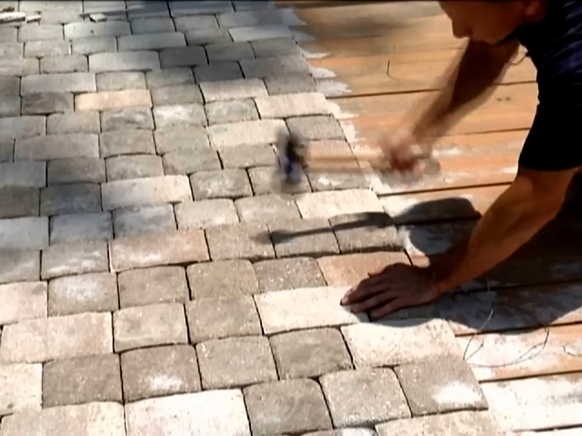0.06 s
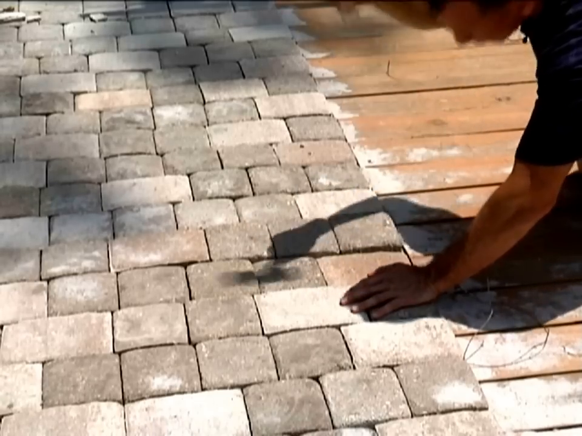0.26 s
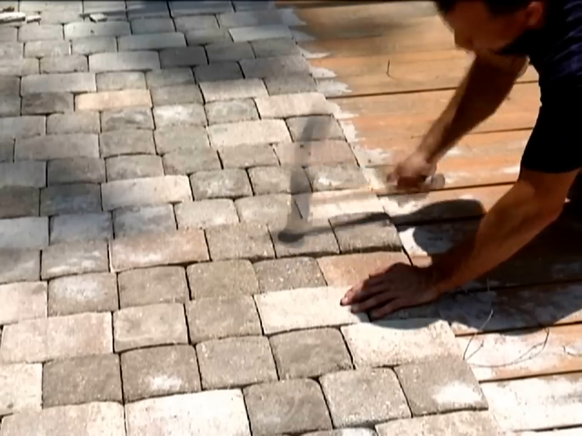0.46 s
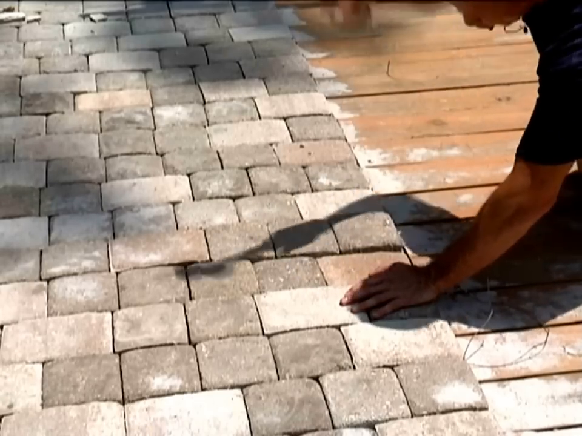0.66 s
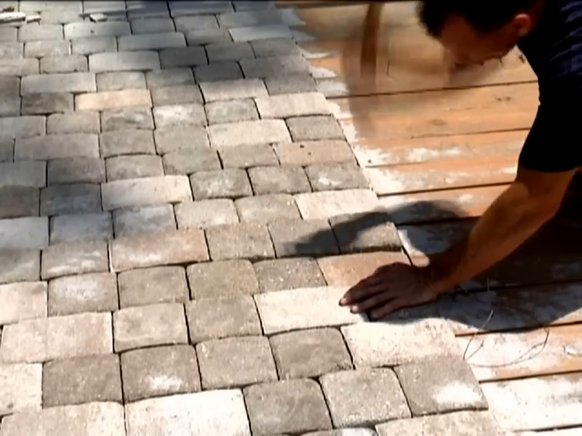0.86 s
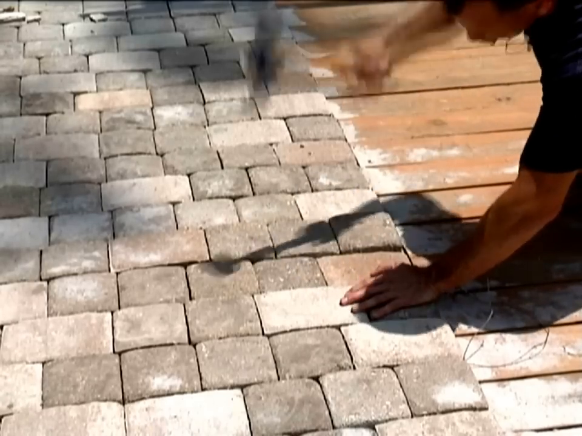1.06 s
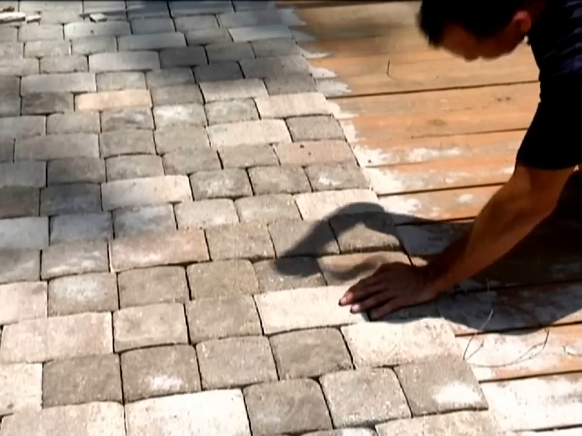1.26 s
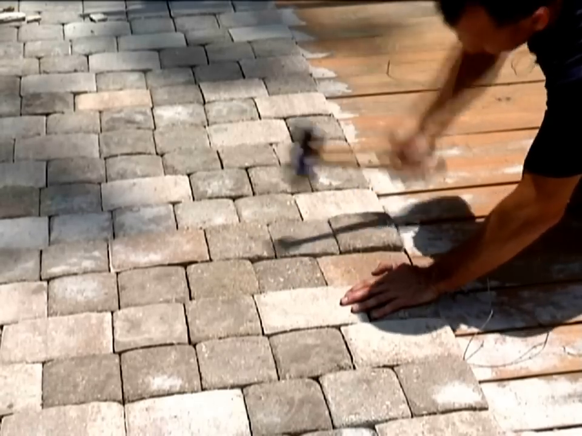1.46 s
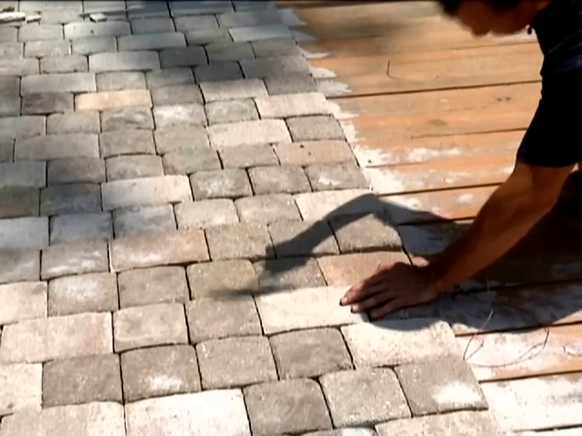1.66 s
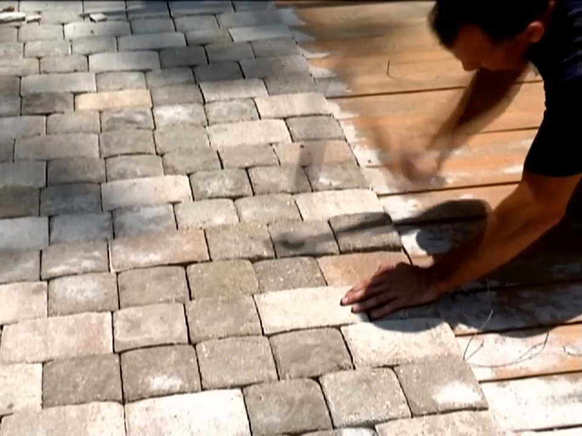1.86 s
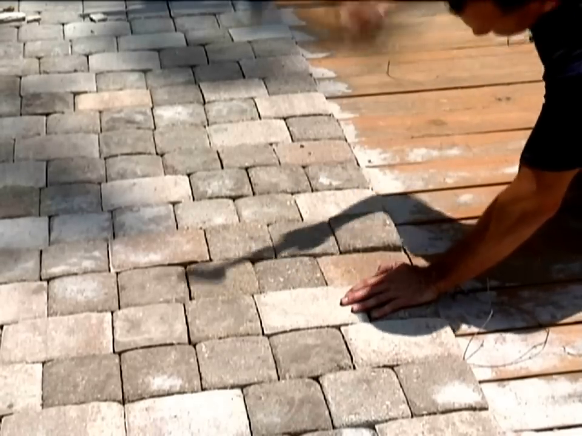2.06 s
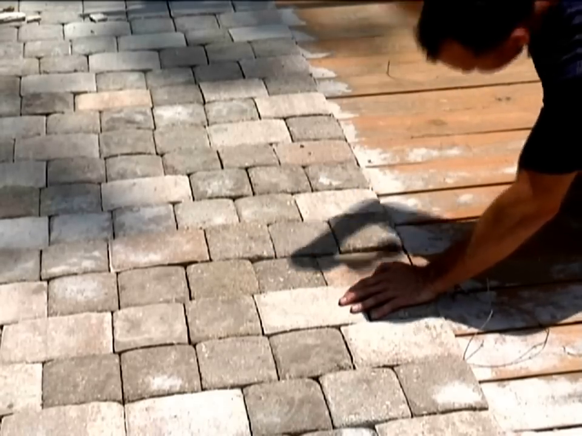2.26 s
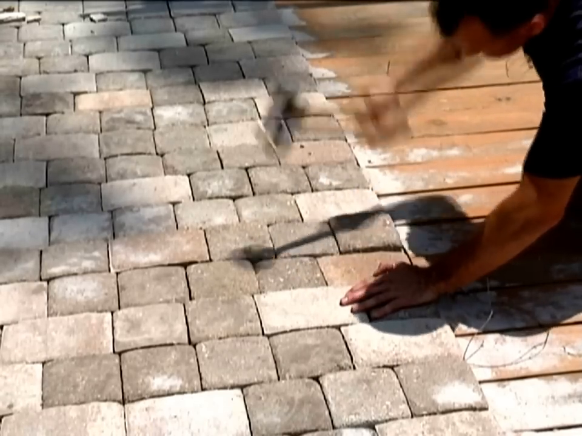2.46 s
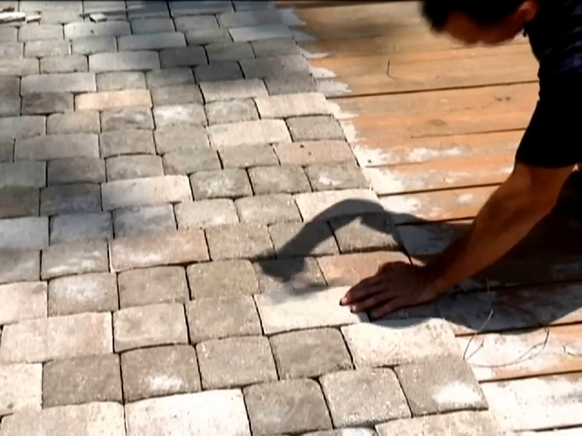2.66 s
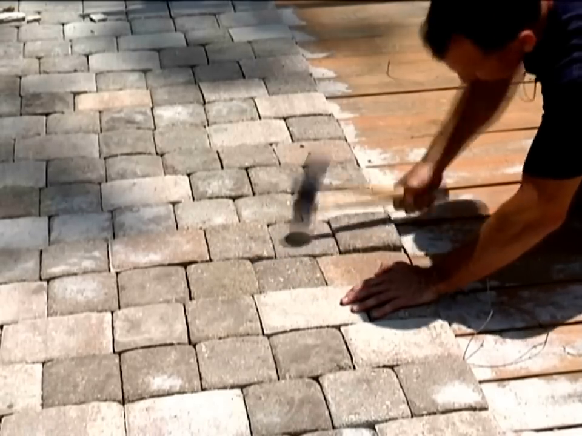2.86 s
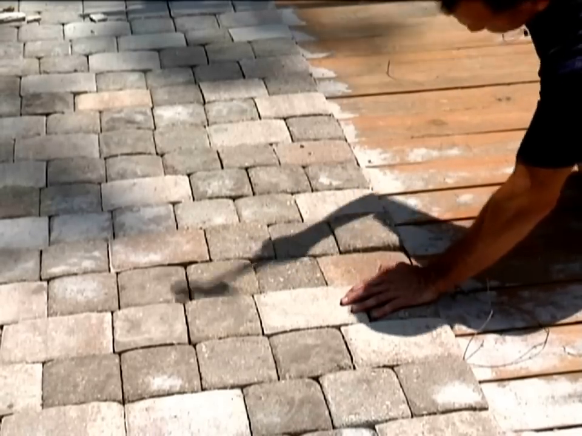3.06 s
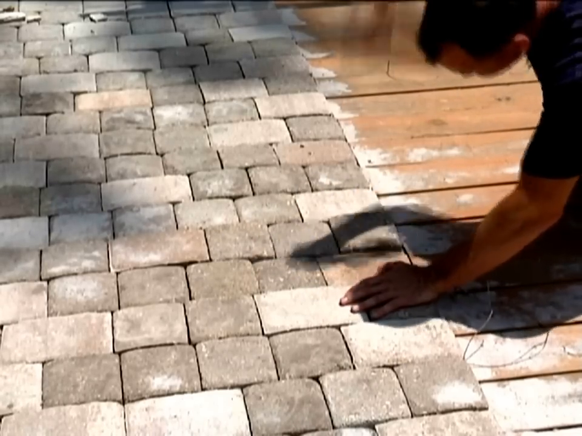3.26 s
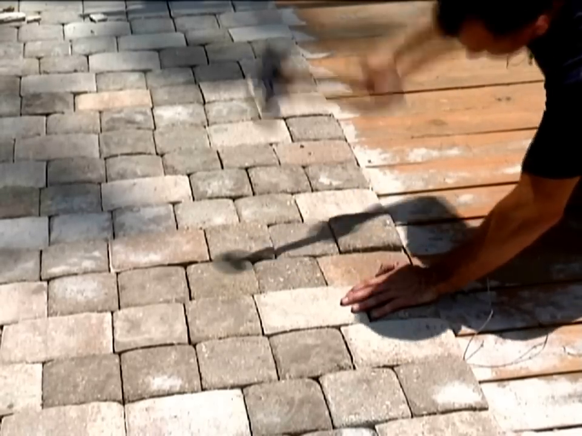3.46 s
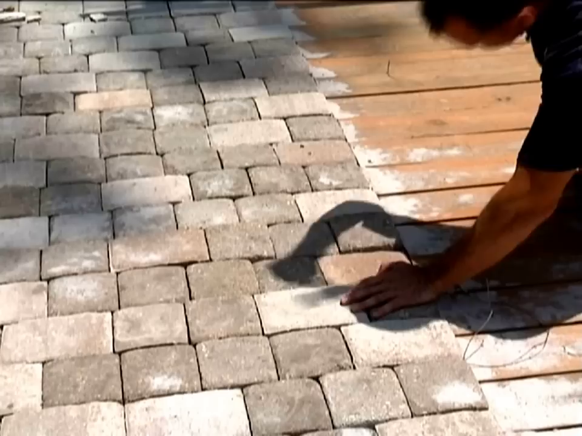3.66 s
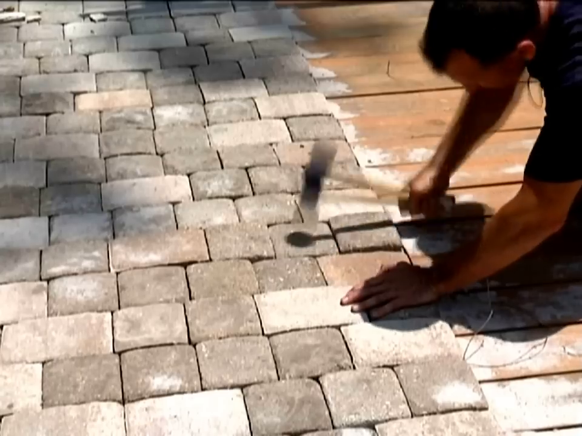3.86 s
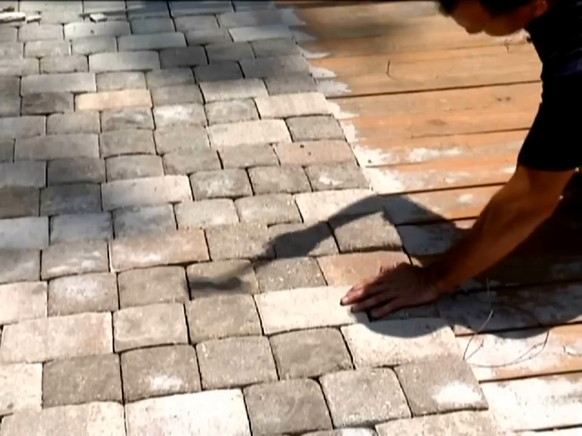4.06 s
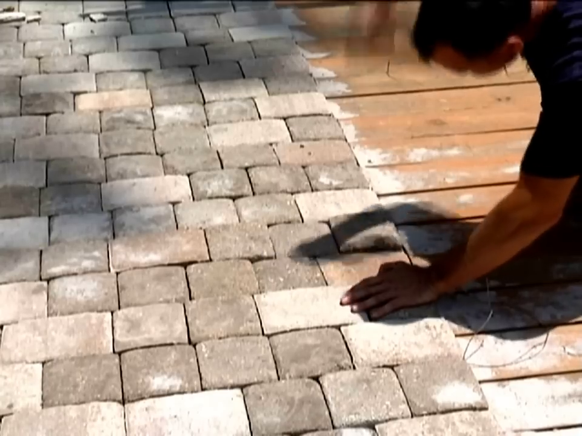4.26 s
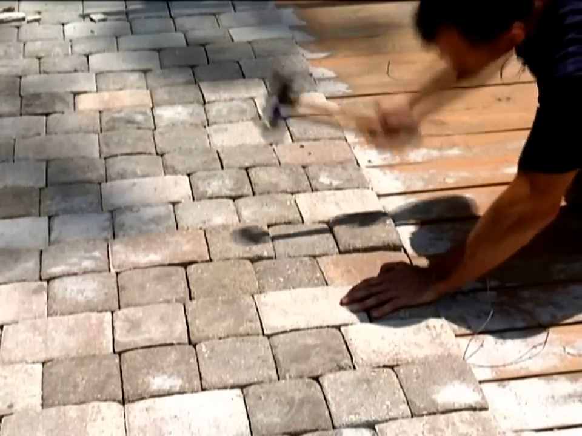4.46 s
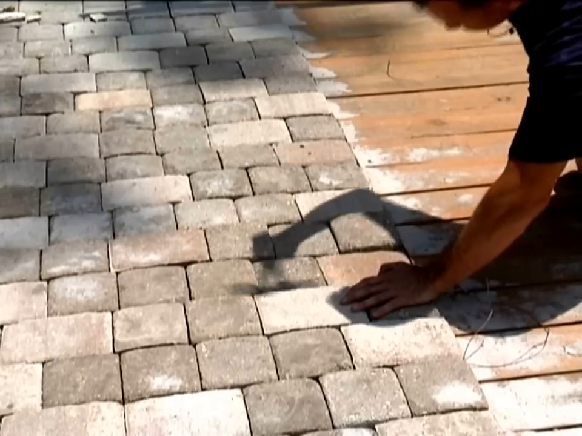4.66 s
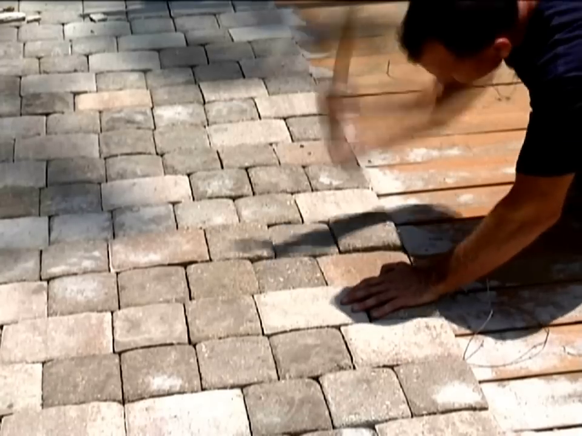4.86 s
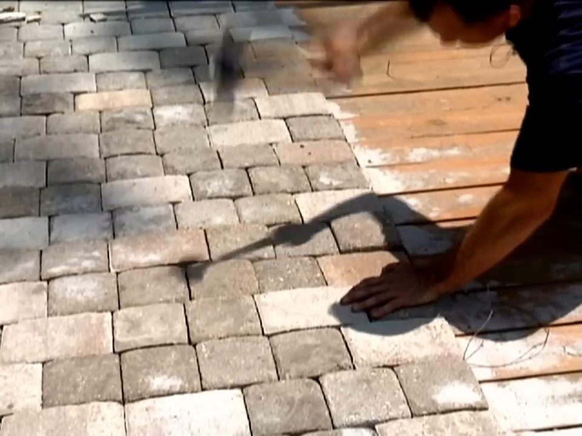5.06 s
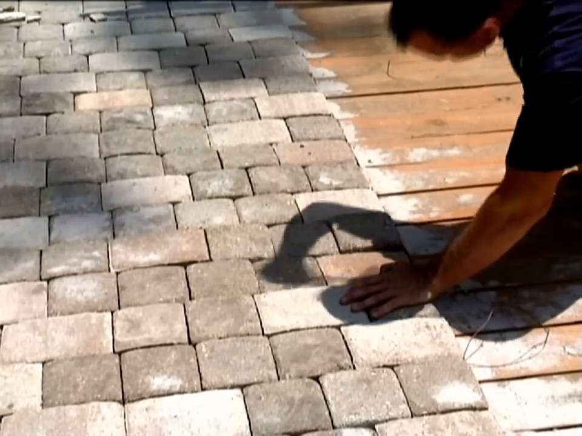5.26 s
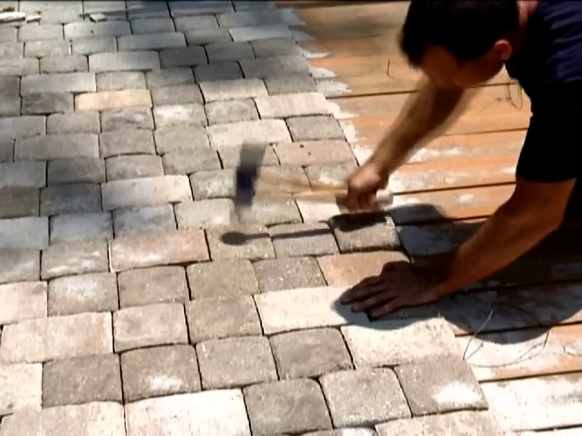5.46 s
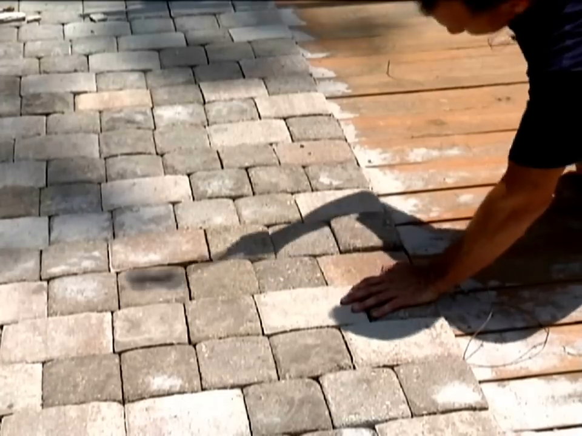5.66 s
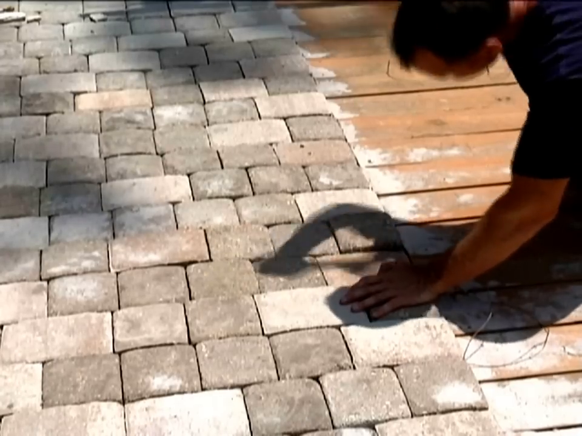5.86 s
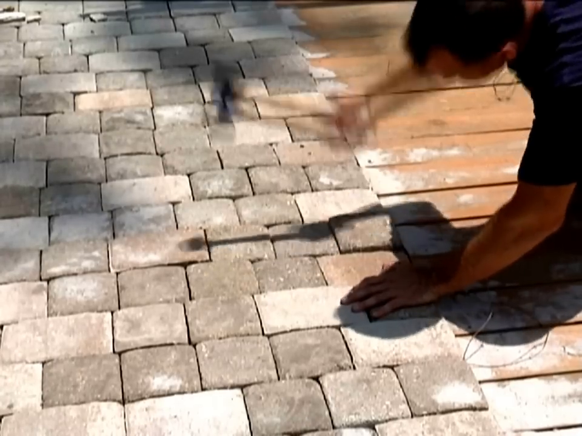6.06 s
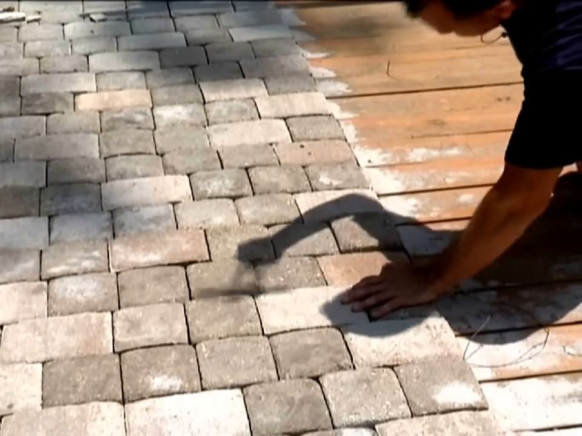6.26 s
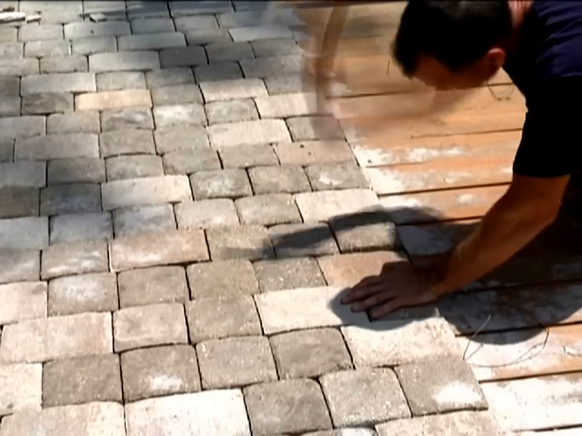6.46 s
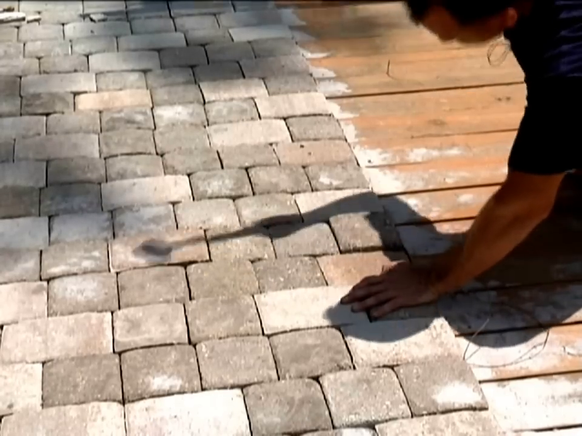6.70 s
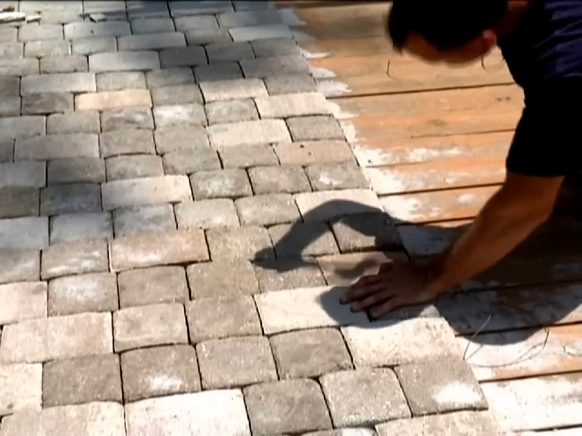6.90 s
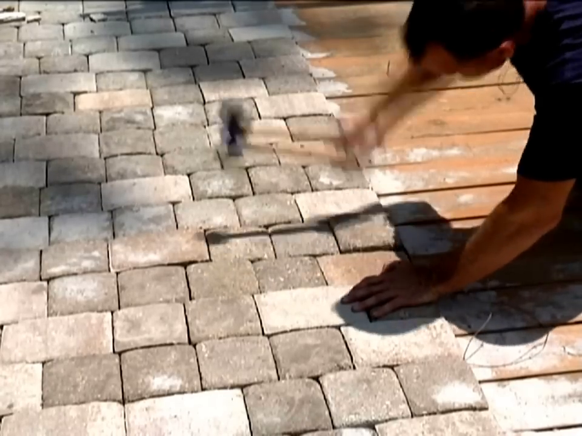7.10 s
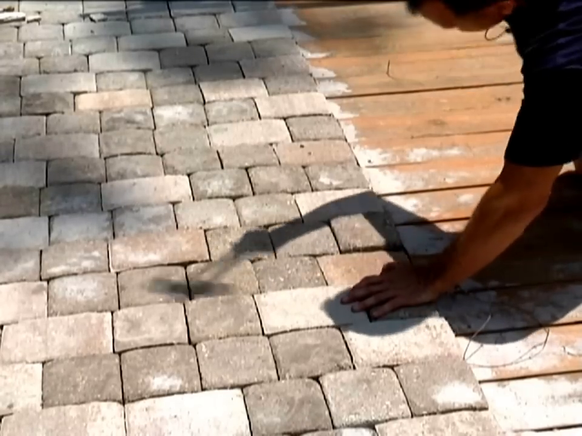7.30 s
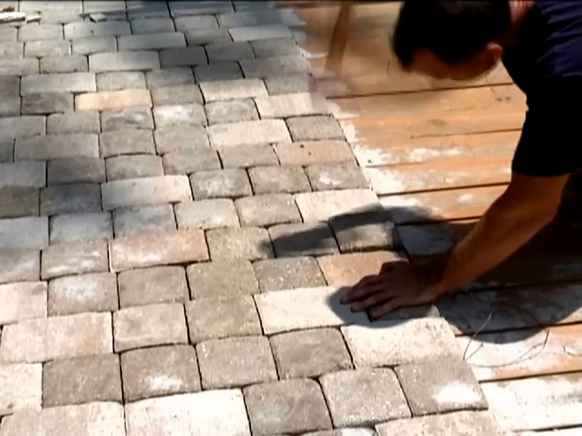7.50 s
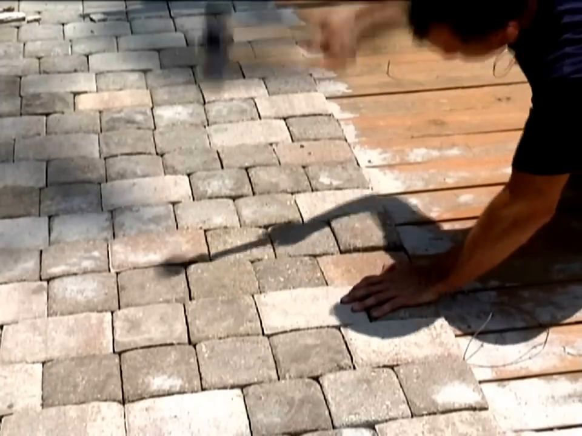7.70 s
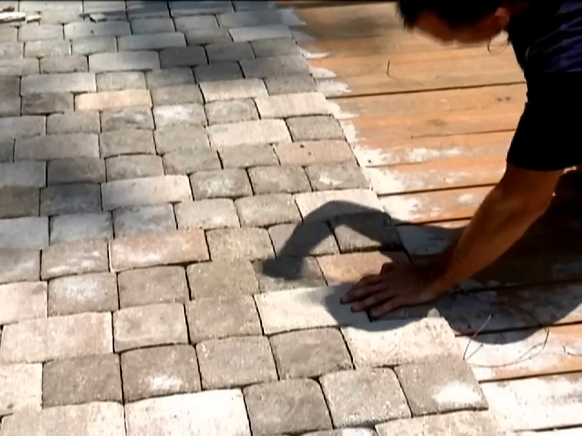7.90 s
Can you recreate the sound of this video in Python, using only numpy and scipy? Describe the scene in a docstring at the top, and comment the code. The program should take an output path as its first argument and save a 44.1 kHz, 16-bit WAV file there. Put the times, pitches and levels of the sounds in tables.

```python
"""Rubber mallet on a paver

A mallet taps a concrete paver into its sand bed on a raised wooden deck, twice a second.
Each blow knocks the paver, booms the deck and throws up sand that patters back; the loose head ticks.
The left microphone is close and overloads on every blow; the right is farther off and hears it later."""
import sys
import numpy as np
from scipy import signal
from scipy.io import wavfile

SR = 44100
rng = np.random.default_rng(int(sys.argv[2]) if len(sys.argv) > 2 else 0)


def bounce(signal):
    """Save signal as a 16-bit WAV file at the path given by the first command-line argument."""
    frames = np.transpose(np.atleast_2d(signal))
    limited = np.clip(frames, -1, 1)
    pcm = np.round(limited * 32767).astype(np.int16)
    wavfile.write(sys.argv[1], SR, pcm)


N = 350018
EVENT_TIME_S = np.arange(int(.8 * SR)) / SR

# mallet blows: start_s, force_db
BLOWS = [(-0.004, -2.5), (0.467, -3.5), (0.9201, 0), (1.3989, 0), (1.878, 0.5), (2.3637, 1), (2.851, 0.5),
         (3.34, 0), (3.8416, 0), (4.3421, 1), (4.9055, 1.5), (5.4415, -2.5), (5.9718, -0.5), (6.5123, 0.2),
         (7.0351, -1), (7.5617, -0.5)]
# seating of the paver, 0 loose to 1 firm: time_s, firmness
BED_FIRMNESS = [(0, 0), (2.5, 0.39), (4.9, 0.14), (5.4, 0.48), (7.6, 0.52)]
# paver modes (firmly bedded ring, crack, drop on its edge): pitch_hz, level_db, t60_s
BITE_MODES = [(869, -3, 0.034), (1328, 1, 0.027), (1902, -1, 0.028)]
CRACK_MODES = [(1314, 12, 0.018), (2020, 3.5, 0.018), (2210, 5, 0.0078), (2627, 6, 0.013),
               (3345, 0, 0.0087), (5494, -2, 0.021), (6330, 4, 0.019), (6720, 5.5, 0.028),
               (8540, 5.5, 0.017), (10944, 11.5, 0.0081)]
EDGE_MODES = [(2590, 8.5, 0.0029), (5500, 0, 0.015), (6160, -1, 0.0095), (6900, 11, 0.0025),
              (8450, 8, 0.002), (10300, 7, 0.0025)]
# deck modes: pitch_hz, t60_s, left_db, right_db
DECK_MODES = [(37.5, 0.34, -25.5, -52), (62.3, 0.37, -23.5, -32), (66.7, 0.082, -8.5, -21),
              (91.2, 0.062, 10, -19), (86.63, 1, -35, -45), (107.7, 0.43, -21.5, -31.5),
              (162.5, 0.32, -21.5, -54), (191.3, 0.58, -28.5, -38), (205.7, 0.061, -13, -10.5),
              (234.5, 0.12, -3, -17.5), (277, 0.16, -23, -17.5), (348, 0.53, -29, -35),
              (398.4, 0.04, -7, -9.5), (444, 0.082, -18, -16.5), (477, 0.12, -16, -26.5),
              (527, 0.077, -9, -48), (731.4, 0.071, -5, -44), (800.4, 0.073, -10.5, -42),
              (878.5, 0.054, -2, -16), (942, 0.082, -18.5, -28)]
# heaves of the whole deck: start_s, level_db
HEAVES = [(3.338, 0.5), (4.3416, 1)]
# diffuse rumble of boards and joists: freq_hz, density_db
RUMBLE_LEFT_SPECTRUM = [(25, -29), (60, 6.5), (120, -7), (210, 0.5), (310, -5), (450, 1.5), (610, -12.5),
                        (750, -12), (1100, -22.5), (2500, -33.5), (4000, -49), (12000, -54)]
RUMBLE_RIGHT_SPECTRUM = [(25, -49), (70, -12), (210, 4.5), (310, -6), (420, 5.5), (620, -9), (750, -11.5),
                         (1200, -19), (2500, -16), (4200, -29.5), (6300, -19), (12000, -47)]
# rumble decay: freq_hz, t60_s
RUMBLE_DECAY = [(40, 0.83), (100, 0.67), (200, 0.71), (450, 0.45), (900, 0.6), (3000, 0.66), (10000, 0.81)]
# mallet head shifting on its handle: start_s, wood_db, bright_db
TICKS = [(0.129, -64, -32.5), (0.905, -30, -27.5), (1.381, -35, -42), (1.447, -36, -32), (1.860, -40, -41),
         (2.1445, -61, -29), (2.3116, -29.5, -29.5), (3.808, -30.5, -47), (5.394, -33.5, -52),
         (5.415, -32, -34), (5.746, -41, -45.5), (6.271, -35, -41), (6.299, -43, -45), (6.823, -29, -32),
         (6.847, -39, -38.5), (7.337, -31.5, -37), (7.352, -41, -40), (7.523, -38, -49), (7.834, -41, -51),
         (7.881, -42.5, -48)]
# mallet modes: pitch_hz, level_db, t60_s
HANDLE_MODES = [(920, -5, .02), (1500, -4, .004), (2150, -3, .006), (2450, -1, .011), (2850, -1, .005)]
HEAD_MODES = [(5450, -1, .008), (6200, 0, .004), (7700, -1, .003), (9500, -4, .004), (10350, -4, .014),
              (11500, -7, .004)]
# hollow between handle and head: freq_hz, gain_db
MALLET_CAVITY = [(2900, 0), (4200, -15.5), (5300, 2.5), (12000, 1)]
# board judders, hand slips, sleeve swishes: start_s, level_db, length_s
JUDDERS = [(4.414, -20, 0.026), (4.452, -24, 0.043)]
SCUFFS = [(2.3405, -28, 0.0027), (2.81, -30, 0.033), (7.521, -29.5, 0.0051)]
SWISHES = [(2.67, -64, 0.015), (3.65, -49, 0.031), (5.755, -44.5, 0.018), (6.305, -46.5, 0.036),
           (6.795, -46, .02), (6.858, -43.5, 0.011), (7.365, -44, 0.017)]
# falling sand, loose board, bracing hand, slipping hand, sleeve, garden air: freq_hz, density_db
SAND_SPECTRUM = [(300, -56), (1200, -7), (2400, -11), (3800, -2), (5700, 3), (7200, -1.5), (9000, -2.5),
                 (11000, -5), (13800, -9), (15200, -73)]
BOARD_SPECTRUM = [(60, -23), (170, 17.5), (450, -3.5), (700, 3), (1200, -14.5), (4300, -26), (9000, -24)]
BRACE_SPECTRUM = [(100, -30), (500, 5), (900, 5.5), (1600, -3), (2600, -7), (4000, -19), (10000, -18),
                  (14000, -32)]
SCUFF_SPECTRUM = [(100, -12), (500, 6), (900, 8), (1600, -1), (2600, -8), (4000, -19), (10000, -12),
                  (14000, -16)]
SLEEVE_SPECTRUM = [(1000, -16), (4000, -16), (6000, -6), (8500, -15), (10500, 1), (12000, -9), (13800, -19),
                   (15000, -27)]
AIR_SPECTRUM = [(20, -11), (55, 2), (110, 3), (160, -4.5), (400, -10.5), (600, -17), (800, -15),
                (1300, -20.5), (2200, -27.5), (3600, -37), (5600, -30), (10500, -31.5), (13300, -35),
                (14200, -76)]
# path of the small sounds to the far microphone: freq_hz, gain_db
FAR_PATH = [(40, -24), (100, -43.5), (300, 1), (1000, -30.5), (2400, -9), (3200, -11), (4500, -19.5),
            (6300, -19.5), (9000, -21.5), (13000, -27)]


def knock(rock_db=11, rock_hz=890, push_db=8, push_hz=520, t60_s=0.019, bite_db=10, far_db=-22):
    """Rubber on concrete: the paver rocks a few cycles, with more bite as it seats; little bass carries."""
    out = np.zeros(N)
    for start_s, force_db in BLOWS:
        firm = firmness(start_s)
        rock_aim, push_aim, bite_aim = 1 + 0.034 * rng.standard_normal(3)  # the struck spot varies
        bite = sum(amp(db) * ring(hz * bite_aim, decay_s) for hz, db, decay_s in BITE_MODES)
        rock = amp(rock_db + 1.3 * force_db) * ring(rock_hz * rock_aim, t60_s)
        push = amp(push_db + 5 * firm) * ring(push_hz * push_aim, t60_s)
        add(out, start_s, -rock - push - amp(bite_db) * firm ** 2 * bite)
    return np.array([high_passed(out, 147), amp(far_db) * high_passed(out, 650, order=2)])


def paver(crack_db=0.16, grind_db=-21, grind_s=.009, rebound_db=-32, rebound_s=.0232):
    """The paver cracks on its neighbours, grinds in its dip and clacks back, harder on a firm bed."""
    out = np.zeros(N)
    for start_s, _ in BLOWS:
        crack = clack(CRACK_MODES, contact_s=0.0013, grit=0.81, spread=0.0374)
        add(out, start_s + 0.00033, amp(crack_db) * crack)
        dip_s = start_s + grind_s * rng.uniform(0.99, 1.5)
        add(out, dip_s, amp(grind_db) * clack(CRACK_MODES, contact_s=0.0071, grit=3.1))
        rebound = clack(EDGE_MODES, contact_s=.0018, grit=0.19)
        add(out, start_s + rebound_s, amp(rebound_db + 20 * firmness(start_s)) * rebound)
    return out


def deck(rumble_db=(-19, -31.5), correlation=0.53, build_s=0.0016, yield_s=0.0029):
    """The heavy deck yields and booms, then rumbles; a firm bed damps its hollow low mids."""
    out = np.zeros((2, N))
    shared_tail = rumble()  # blows land close together, so their tails are alike
    for start_s, force_db in BLOWS:
        firm = firmness(start_s)
        boom_damping = [(100, 0), (200, -9 * firm), (450, -9 * firm), (750, 0)]
        boom = 0
        for hz, t60_s, left_db, right_db in DECK_MODES:
            gains = amp(np.array([[left_db], [right_db]]) + value_at(boom_damping, hz))
            boom -= gains * ring(hz * (1 + 0.013 * rng.standard_normal()), t60_s)
        boom *= 1 - np.exp(-(EVENT_TIME_S / yield_s) ** 2)
        tail = correlation * shared_tail + np.sqrt(1 - correlation ** 2) * rumble()
        tail_damping = [(100, 0), (300, -6 * firm ** 2), (750, 0)]
        tail = np.array([coloured(side, tail_damping) for side in tail])
        tail *= amp(np.array(rumble_db) + 0.9 * force_db)[:, None]
        tail *= 1 - np.exp(-EVENT_TIME_S / build_s)
        add(out, start_s, boom + tail)
    for start_s, db in HEAVES:
        add(out, start_s, -amp([[db], [db - 24]]) * ring(hz=27, t60_s=0.1))
    return out


def rumble():
    """Countless deck modes as stereo noise, each band dying at its own rate."""
    size = len(EVENT_TIME_S)
    sides = []
    for spectrum in RUMBLE_LEFT_SPECTRUM, RUMBLE_RIGHT_SPECTRUM:
        hz, time_s, bands = signal.stft(noise(spectrum, size), SR, nperseg=1024)
        decay = amp(-60 * time_s / value_at(RUMBLE_DECAY, hz)[:, None])
        sides.append(signal.istft(bands * decay, SR, nperseg=1024)[1][:size])
    return np.array(sides)


def sand(level_db=-38, flight_s=0.096, scatter=0.47, spray_s=0.059, trickle_s=0.48,
         loose_hz=3160, firm_hz=2000):
    """Grains spray from the joints, patter back and trickle; the joints' hollow sinks as the bed firms."""
    out = np.zeros(N)
    size = len(EVENT_TIME_S)
    spray = amp(-1) * np.exp(-EVENT_TIME_S / spray_s)
    landing = np.exp(-np.log((EVENT_TIME_S + 1e-5) / flight_s) ** 2 / (2 * scatter ** 2))
    trickle = amp(-10) * np.exp(-EVENT_TIME_S / trickle_s)
    flow = np.sqrt(spray ** 2 + landing ** 2 + trickle ** 2)
    for start_s, force_db in BLOWS:
        firm = firmness(start_s)
        fine_db = 7.5 + 0.6 * force_db - 5 * firm  # hard blows throw finer sand; a firm bed has less
        grains = unit_rms(rng.standard_normal(size) * amp(3.5 * np.minimum(rng.exponential(1, size), 6)))
        hiss = unit_rms(coloured(coloured(grains, SAND_SPECTRUM), [(6000, 0), (10000, fine_db)]))
        hollow = resonance(grains, loose_hz * (firm_hz / loose_hz) ** firm, q=3.5)
        add(out, start_s, amp(level_db + 1.9 * force_db) * flow * (hiss + amp(-7) * hollow))
    return out


def mallet_ticks():
    """The loose head ticks on the handle as the swing turns round."""
    out = np.zeros(N)
    for start_s, wood_db, bright_db in TICKS:
        wood = clack(HANDLE_MODES, contact_s=0.0015, grit=0.27, spread=0.014)
        bright = clack(HEAD_MODES, contact_s=0.00025, grit=0.1, spread=0.024)
        add(out, start_s, amp(wood_db) * wood + amp(bright_db + 3) * bright)
    return coloured(out, MALLET_CAVITY)


def loose_board():
    """A loose board judders after a heavy blow."""
    return rubs(JUDDERS, BOARD_SPECTRUM)


def hand(lead_s=.028, brace_db=-40.5, brace_s=.018):
    """The resting hand rubs the stones as it braces for each blow, and now and then slips."""
    braces = [(start_s - lead_s, brace_db + 2 * force_db, brace_s) for start_s, force_db in BLOWS]
    return rubs(braces, BRACE_SPECTRUM) + rubs(SCUFFS, SCUFF_SPECTRUM)


def sleeve():
    """The sleeve swishes as the arm turns round."""
    return rubs(SWISHES, SLEEVE_SPECTRUM)


def garden_air(level_db=(-42, -56), sway_db=0.1, hum_db=-62, hum_hz=347):
    """Nearly steady air with a faint wavering hum."""
    time_s = np.arange(N) / SR
    sways = [np.sin(2 * np.pi * (hz * time_s + rng.random())) / np.sqrt(hz)
             for hz in np.geomspace(.3, 6, 20)]
    breeze = unit_rms(sum(sways))
    hum = resonance(rng.standard_normal(N), hum_hz, q=60)
    air = np.array([amp(db + sway_db * breeze) * noise(AIR_SPECTRUM, N) for db in level_db])
    return air + amp(hum_db) * hum


def firmness(time_s):
    """How firmly the paver sits in its bed."""
    return np.interp(time_s, *np.transpose(BED_FIRMNESS))


def ring(hz, t60_s):
    """One struck mode."""
    return np.sin(2 * np.pi * hz * EVENT_TIME_S) * amp(-60 * EVENT_TIME_S / t60_s)


def clack(modes, contact_s, grit, spread=0.026):
    """A gritty contact rings randomly detuned modes; rms 1 over the first 4 ms."""
    size, attack = SR // 8, slice(0, SR // 250)
    contact = rng.standard_normal(size) * np.exp(-EVENT_TIME_S[:size] / contact_s)
    body = sum(amp(db) * ring(hz * (1 + spread * rng.standard_normal()), t60_s)
               for hz, db, t60_s in modes)
    ringing = signal.fftconvolve(contact, body[:size])[:size]
    sound = ringing / ringing[attack].std() + grit * contact / contact[attack].std()
    return sound / sound[attack].std()


def rubs(events, spectrum):
    """Short swells of noise, each peaking at half its length_s."""
    out = np.zeros(N)
    for start_s, db, length_s in events:
        rise = EVENT_TIME_S / (length_s / 2)
        swell = rise * np.exp(1 - rise)
        add(out, start_s, amp(db) * swell * noise(spectrum, len(swell)))
    return out


def noise(spectrum, size):
    """Coloured noise, rms 1."""
    return unit_rms(coloured(rng.standard_normal(size), spectrum))


def coloured(x, curve):
    """Minimum-phase filter: attacks stay sharp."""
    log_gain = np.log(amp(value_at(curve, abs(np.fft.fftfreq(8192, 1 / SR)))))
    response = np.exp(np.conj(signal.hilbert(log_gain)))
    taps = np.fft.ifft(response).real[:4096]
    return signal.oaconvolve(x, taps)[:len(x)]


def resonance(x, hz, q):
    """One resonant band of x, rms 1."""
    return unit_rms(signal.lfilter(*signal.iirpeak(hz, q, SR), x))


def high_passed(x, hz, order=1):
    """Butterworth bass cut."""
    return signal.lfilter(*signal.butter(order, hz, "highpass", fs=SR), x)


def value_at(curve, hz):
    """Interpolates over log frequency."""
    freq_hz, values = np.transpose(curve)
    return np.interp(np.log(hz + 1), np.log(freq_hz + 1), values)


def amp(db):
    """Decibels to gain."""
    return 10 ** (np.asarray(db) / 20)


def unit_rms(x):
    """Scales to rms 1."""
    return x / np.sqrt(np.mean(x ** 2) + 1e-20)


def add(mix, start_s, sound):
    """Mixes a sound in, cropped at both ends of the mix."""
    start = round(start_s * SR)
    sound = sound[..., max(-start, 0):]
    part = mix[..., max(start, 0):][..., :sound.shape[-1]]
    part += sound[..., :part.shape[-1]]


def scene(far_delay_s=.0052):
    """All sources at the near (left) and far (right) microphone."""
    small_sounds = paver() + sand() + mallet_ticks() + hand() + loose_board() + sleeve()
    near, far = deck() + knock() + np.array([small_sounds, coloured(small_sounds, FAR_PATH)])
    out = garden_air()
    add(out[0], 0, near)
    add(out[1], far_delay_s, high_passed(far, 84, order=2))
    return out


def record(dry, ceiling=.42, hardness=4, leak=.025, cutoff_hz=15500):
    """Input overload squashes the peaks of each blow; a band limit follows."""
    clipped = dry / (1 + abs(dry / ceiling) ** hardness) ** (1 / hardness) + leak * dry
    low_pass = signal.firwin(127, cutoff_hz, window=("kaiser", 9), fs=SR)
    return signal.oaconvolve(high_passed(clipped, 8), low_pass[None], "same")


dry = scene()
out = record(dry)
bounce(out)
```